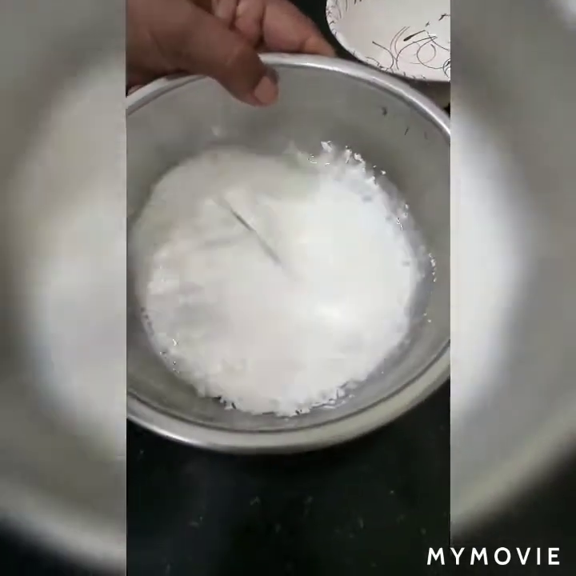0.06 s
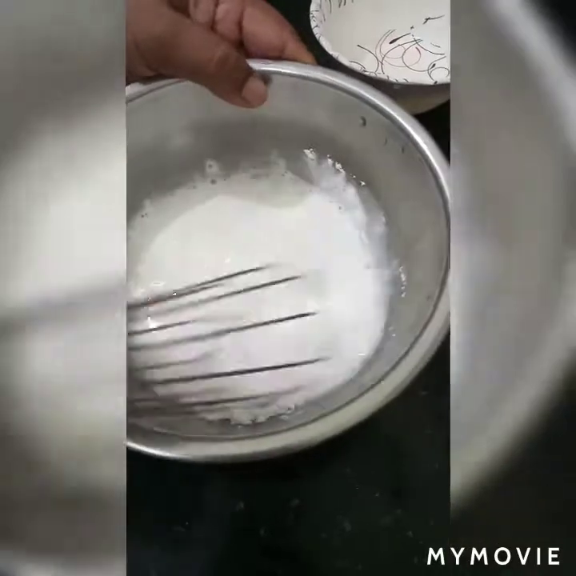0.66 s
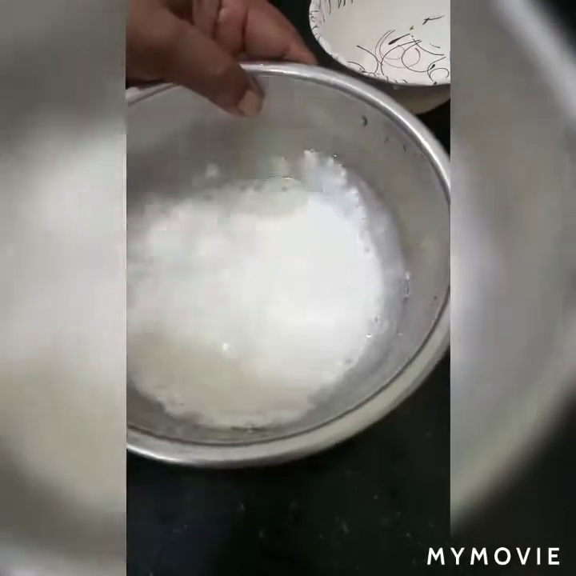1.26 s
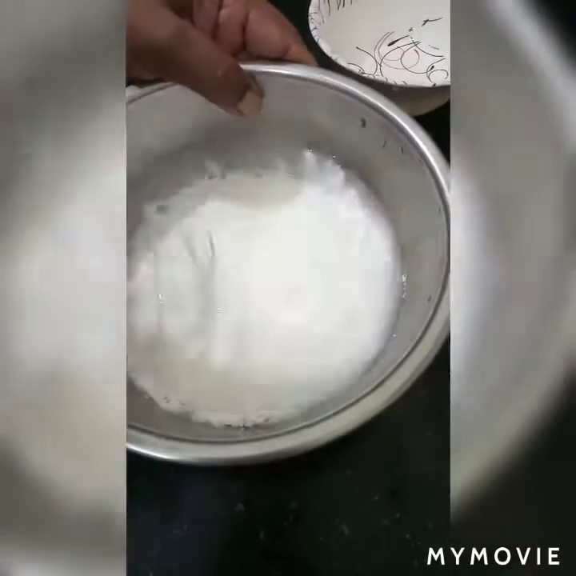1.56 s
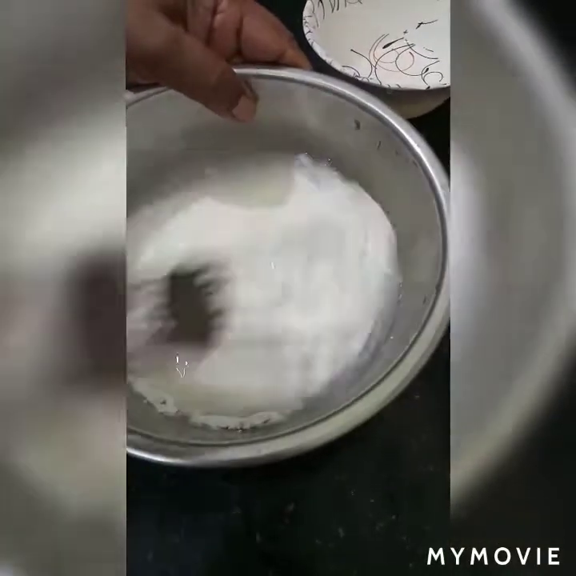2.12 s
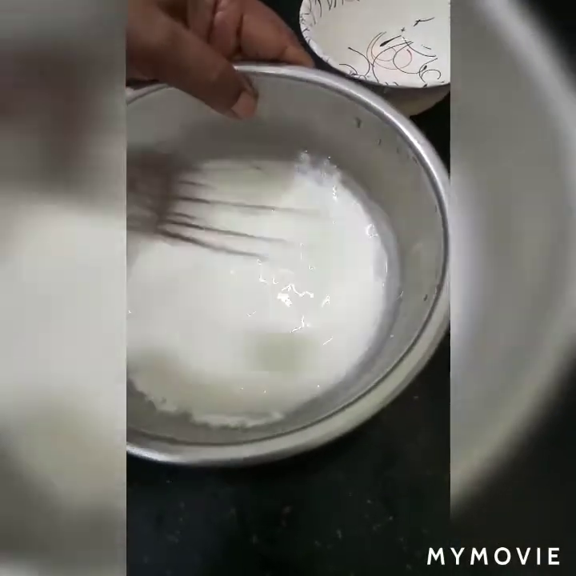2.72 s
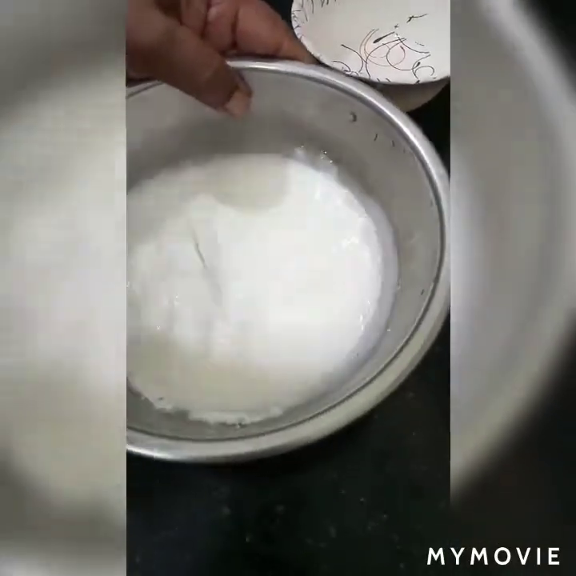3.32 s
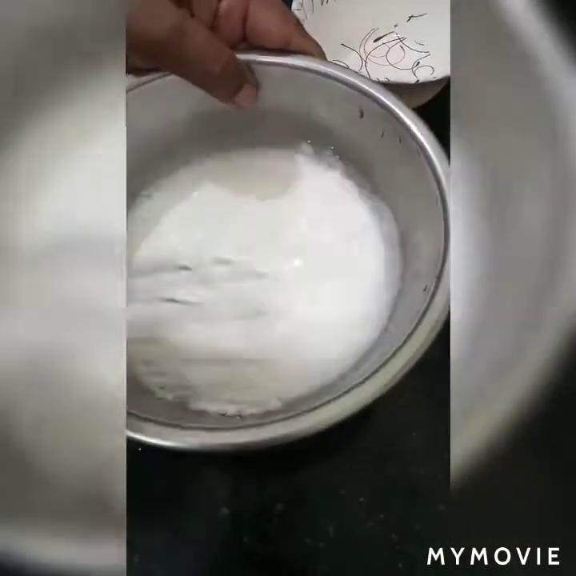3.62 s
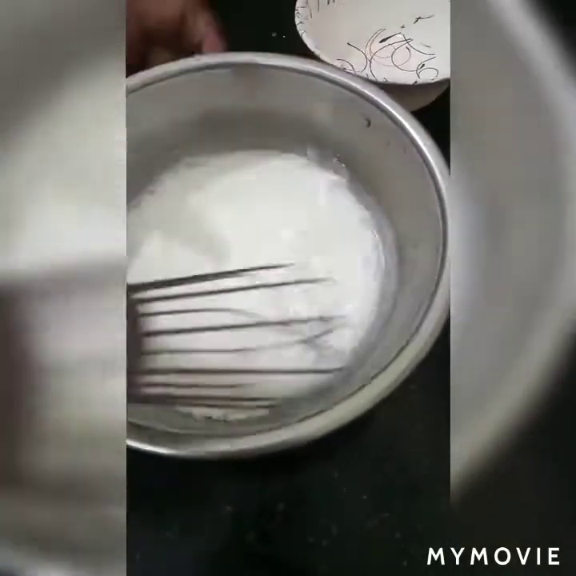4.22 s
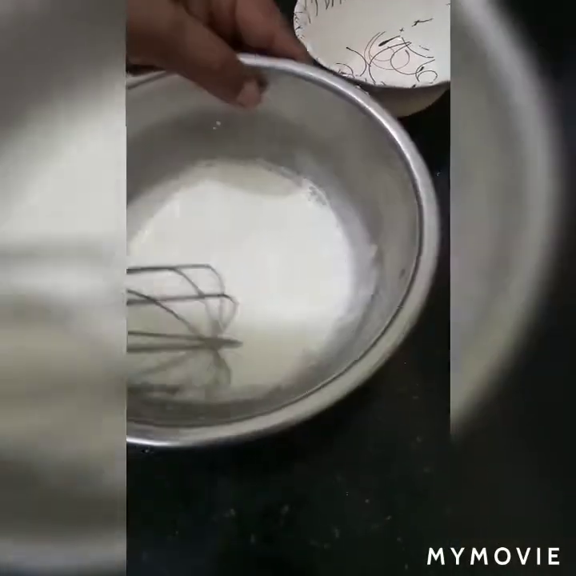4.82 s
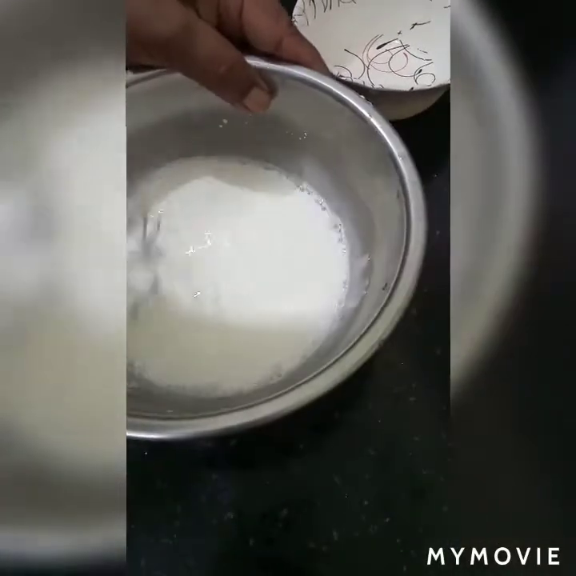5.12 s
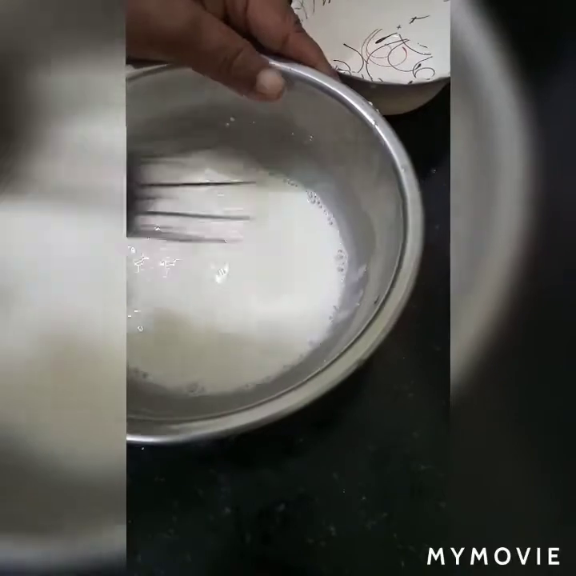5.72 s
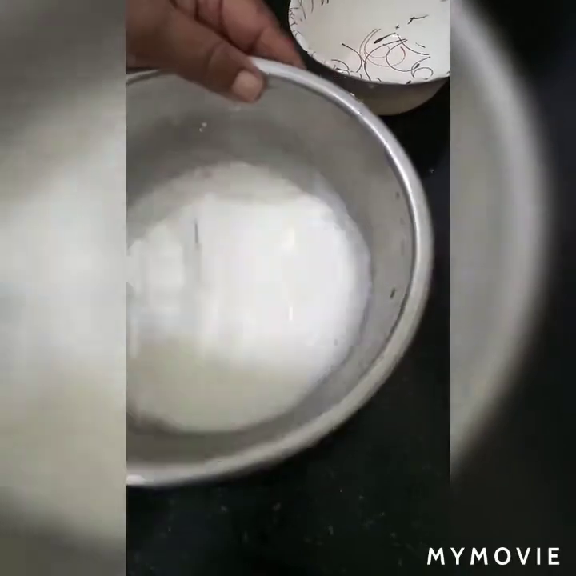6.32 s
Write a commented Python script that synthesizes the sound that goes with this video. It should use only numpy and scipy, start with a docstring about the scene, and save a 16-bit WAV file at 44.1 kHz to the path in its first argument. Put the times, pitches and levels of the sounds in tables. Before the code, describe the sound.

Close by in a small kitchen, thin batter churns and gurgles under rapid strokes of a wire whisk. Bright scrapes and clashing wires mix with metallic knocks against the steel bowl, which become stronger after the opening. Around four seconds in, the bowl rings more freely and soon gives a short, loud skid on the counter before the beating continues. A motor hums faintly throughout.

```python
"""Whisking batter in a steel bowl

A wire whisk beats thin batter, three or four strokes a second, in a small kitchen with a humming motor.
The wires clash with each other, knock on the wall, scrape the floor and churn the liquid, which
sloshes and plops. The steadying hand lets go for a moment: the bowl rings freely, then judders
across the stone counter."""
import sys
import numpy as np
from scipy import signal
from scipy.fft import rfft, irfft, next_fast_len
from scipy.io import wavfile
from scipy.ndimage import map_coordinates

SR = 44100
rng = np.random.default_rng(int(sys.argv[2]) if len(sys.argv) > 2 else 0)


def digitize_waveform(pressure):
    """Quantize a signal to 16-bit integers and store it at the path in sys.argv[1].

    Rows of a 2-D input are taken as channels; values are limited to [-1, 1].
    """
    field = np.atleast_2d(pressure).T
    bounded = np.clip(field, -1, 1)
    quanta = np.round(bounded * 32767).astype(np.int16)
    wavfile.write(sys.argv[1], SR, quanta)


N = 280476
TIME = np.arange(N) / SR
RING_TIME = np.arange(SR * 2 // 3) / SR


def amp(db):
    """Decibels to gain."""
    return 10 ** (np.asarray(db) / 20)


def unit(x):
    """Scale to rms 1."""
    return x / np.sqrt(np.mean(x ** 2) + 1e-20)


def along(points, hz):
    """Read a curve of (Hz, value) points on a log frequency axis."""
    freqs, values = np.transpose(points)
    return np.interp(np.log(hz + 1), np.log(freqs + 1), values)


def curves(rows):
    """Automation lanes: one value per sample for each column after the time."""
    times, *columns = np.transpose(rows)
    return [np.interp(TIME, times, column) for column in columns]


def wobble(rate):
    """A smooth random curve, `rate` knots a second."""
    return map_coordinates(rng.standard_normal(int(N * rate / SR) + 4), [TIME * rate])


def add(track, s, x):
    """Mix x into the track at s seconds."""
    start = int(np.clip(round(s * SR), 0, N - 1))
    track[start:start + len(x)] += x[:N - start]


def colour(spectrum, lo_hz=1, hi_hz=SR, size=2048):
    """One band of an EQ curve as a minimum-phase impulse response of energy 1."""
    hz = np.fft.rfftfreq(size, 1 / SR) + 1
    gain = amp(along(spectrum, hz)) / np.sqrt((1 + (lo_hz / hz) ** 10) * (1 + (hz / hi_hz) ** 10))
    cepstrum = irfft(np.log(gain + 1e-5))[:size // 2]
    response = irfft(np.exp(rfft(np.r_[cepstrum[0], 2 * cepstrum[1:]], size)))
    return response / np.linalg.norm(response)


def through(x, response):
    """Send x through an impulse response, cut to the length of the scene."""
    return signal.fftconvolve(x, response)[:N]


def resonate(x, response):
    """Let x ring a resonator, keeping the energy of x."""
    ring = through(x, response)
    return ring * np.linalg.norm(x) / np.linalg.norm(ring)


def note(hz, t60, attack, rise=0):
    """One damped tone whose pitch may glide up as it dies."""
    t = RING_TIME[:SR // 8]
    envelope = amp(-60 * t / t60) * (1 - np.exp(-t / attack))
    return envelope * np.sin(2 * np.pi * hz * t * (1 + rise * t / t60))


def ringing(modes, damping, scatter_db, detune=0, attack=0.022):
    """Decaying modes, struck at a new spot each time; damping divides their decay times."""
    hz, db, t60 = np.transpose(modes)[:, :, None]
    hz = hz * (1 + detune * rng.standard_normal(hz.shape))
    t = RING_TIME[:int(len(RING_TIME) / max(damping, 1))]
    level = db + scatter_db * rng.standard_normal(hz.shape) - 60 * t * damping / t60
    partials = amp(level) * np.sin(2 * np.pi * (hz * t + rng.random(hz.shape)))
    return partials.sum(axis=0) * (1 - np.exp(-t / attack))


def grit(count, spread_db):
    """Micro-contacts: noise whose force jumps every 16 samples; rms 1."""
    force = amp(spread_db * np.repeat(rng.standard_normal(count), 16)[:count])
    return unit(rng.standard_normal(count) * force)


def chatter(length, spread_db, after_db, after_t60):
    """Contacts land one after another in a short burst, then shiver away."""
    t = RING_TIME[:SR // 6]
    burst = np.exp(-(t / max(length, .001)) ** 3) + amp(after_db - 60 * t / after_t60)
    return grit(len(t), spread_db) * burst * (1 - np.exp(-t / .0008))


def shifting(modes, t60, depth_db, rate):
    """Resonances that swell and fade each on its own, so the colour keeps moving; rms 1."""
    drives = [grit(N, spread_db=3) * amp(db + depth_db * wobble(rate)) for _, db in modes]
    return unit(sum(through(drive, note(hz, t60, attack=.0005)) for drive, (hz, _) in zip(drives, modes)))


def bubbles(per_second, centre_hz, octaves, cycles, spread_db, rise, size=1400):
    """Small pockets of air, each a short note that rises as it closes; rms 1."""
    when, pitch, strength = rng.random((int(per_second * N / SR), 3)).T
    hz = centre_hz * 2 ** (octaves * (pitch[:, None] - .5))
    age = hz * np.arange(size) / SR / cycles
    gain = amp(-spread_db * np.log(strength + .01))[:, None]
    notes = gain * np.exp(-3 * age) * np.sin(2 * np.pi * cycles * age * (1 + rise * age))
    index = (when * N).astype(int)[:, None] + np.arange(size)
    return unit(np.bincount(index.ravel(), notes.ravel(), N)[:N])


# motor partials: (frequency [Hz], level [dB])
MOTOR_HUM = [(98.3, -64), (177, -70), (244.5, -60.5), (274, -67), (296, -66.5)]
# EQ of the air bed: (frequency [Hz], level [dB])
AIR_EQ = [(20, -28), (50, -6), (80, 1), (130, -2.5), (185, 11.5), (270, 4.5), (350, -16.5), (470, -20),
          (640, -31), (2000, -50), (15000, -88)]


def room_tone():
    """A motor hums unsteadily over a low rush of air."""
    hum = np.zeros(N)
    for hz, db in MOTOR_HUM:
        gain = np.sqrt(2) * amp(db + 2.5 * wobble(7))
        hum += gain * np.sin(2 * np.pi * hz * TIME + 1.1 * wobble(8))
    return hum + amp(-63.5) * through(rng.standard_normal(N), colour(AIR_EQ))


# reverb decay: (frequency [Hz], t60 [s])
KITCHEN_DECAY = [(200, 0.71), (1200, 0.27), (4000, 0.25), (10000, 0.2), (16000, 0.26)]


def kitchen_reverb(x):
    """Hard walls close by: a short, bright tail after 5 ms of pre-delay."""
    hz, t, noise = signal.stft(rng.standard_normal(SR // 2), SR, nperseg=256)
    decay = amp(-60 * t / along(KITCHEN_DECAY, hz)[:, None])
    tail = signal.istft(noise * decay, SR, nperseg=256)[1]
    return through(x, np.pad(tail / np.linalg.norm(tail), (int(.005 * SR), 0)))


# how hard the mass of batter swings: (time [s], level [dB])
SLOSH_FADER = [(0.0, -47.5), (0.07, -69), (0.18, -46), (0.37, -64), (0.41, -44.5), (0.67, -62), (0.71, -53),
               (1.03, -52.5), (1.04, -55.5), (1.72, -48.5), (1.96, -66), (2.04, -46), (2.07, -62),
               (2.12, -50), (2.23, -83), (2.27, -58), (2.48, -48.5), (2.53, -65), (2.71, -50.5),
               (2.96, -60), (3.12, -45), (3.17, -61), (3.49, -46.5), (3.51, -64), (3.72, -52),
               (3.74, -50.5), (4.27, -55), (4.29, -47), (4.52, -56), (4.64, -56), (4.68, -46),
               (4.69, -43.5), (4.87, -46), (4.92, -59), (5.07, -51), (5.1, -56.5), (6.13, -52),
               (6.24, -53.5), (6.32, -51.5), (6.36, -66)]
# its dull body: (frequency [Hz], level [dB])
SLOSH_EQ = [(60, -27.5), (130, -6), (185, 1), (240, 1), (340, -7.5), (470, -14.5), (620, -35), (1200, -43),
            (3000, -54)]


def slosh():
    """The mass of batter swings round the bowl in dull, lumpy surges."""
    surges = rng.standard_normal(N) * amp(1.6 * wobble(30))
    return amp(curves(SLOSH_FADER)[0] - 3) * unit(through(surges, colour(SLOSH_EQ)))


# hollows opening in the wake: (frequency [Hz], level [dB])
WAKE_CAVITIES = [(840, 1.5), (1060, 1.5), (1330, 1), (1610, -2.5), (1850, -0.5), (2600, -6), (3050, -4)]
# splashing batter: (frequency [Hz], level [dB])
SPLASH_EQ = [(200, 3), (450, 7.5), (680, -6), (850, -20), (1700, 7.5), (2300, -2.5), (4000, 2.5),
             (9000, -15)]


def churn(level_db):
    """The batter bubbles, gurgles and splashes behind the wires."""
    wet = bubbles(per_second=160, centre_hz=1200, octaves=1.3, cycles=16, spread_db=1.8, rise=.03)
    gurgle = shifting(WAKE_CAVITIES, t60=.055, depth_db=7, rate=35)
    splash = through(grit(N, spread_db=3) * amp(4 * wobble(60)), colour(SPLASH_EQ))
    return amp(level_db) * (amp(-10) * wet + amp(-7.5) * gurgle + amp(-9.5) * splash)


# batter closing behind the wires: (time [s], level [dB], pitch [Hz])
PLOP_CUES = [(0.119, -37.5, 1050), (0.14, -39, 976), (0.165, -40, 813), (0.993, -43.5, 1065),
             (1.394, -33, 1187), (1.464, -39, 1690), (1.482, -31.5, 1118), (1.669, -32, 845),
             (1.732, -31, 840), (1.796, -41, 1120), (1.844, -30.5, 1024), (1.875, -41, 947),
             (2.038, -31, 1614), (2.089, -32.5, 1345), (2.107, -30.5, 1320), (2.386, -33.5, 1350),
             (2.792, -33, 927), (2.865, -40, 1070), (2.953, -34.5, 1260), (3.212, -34.5, 1060),
             (3.421, -35, 1350), (3.552, -25.5, 1037), (3.893, -23.5, 1124), (4.087, -35.5, 820),
             (4.327, -29.5, 1275), (5.004, -37.5, 1735), (5.907, -29.5, 1024), (5.941, -36.5, 1016),
             (6.214, -41, 1430)]
# a collapsing air pocket: (frequency [Hz], level [dB])
POCKET_EQ = [(200, -9.5), (480, -5.5), (680, -22.5), (850, 7.5), (1300, 0.5), (1800, -2.5), (2300, -12),
             (4000, -7), (9000, -18)]


def plops():
    """Larger air pockets: a wet slap, a short rising note and a smaller pocket just after it."""
    out = np.zeros(N)
    for s, db, hz in PLOP_CUES:
        slap = through(chatter(.011, spread_db=2, after_db=-15, after_t60=.15), colour(POCKET_EQ))
        add(out, s, amp(db - 12.5) * slap)
        add(out, s, amp(db - 8) * note(hz, t60=.06, attack=.0012, rise=.03))
        lag_s, small_hz = rng.uniform(0, .005), hz * rng.uniform(1.25, 1.6)
        add(out, s + lag_s, amp(db - 11) * note(small_hz, t60=.035, attack=.001, rise=.06))
    return out


# the free steel bowl: (frequency [Hz], level [dB], t60 before damping [s])
BOWL_MODES = [(178, -13, .6), (440, -15, .2), (763, -6, .28), (812, 8, .3), (907, -1, .22), (970, -7, .2),
              (1114, 4, .5), (1126, -8, .25), (1260, -6, .2), (1390, -6, .15), (1646, -5, .22),
              (1772, -5, .22), (1860, -6, .18), (2347, -3, .33), (2536, -11, .22), (3047, -14, .4),
              (3975, -2, .4), (4110, -3, .32), (4366, -4, .35), (4522, -4, .29), (5055, -4, .23),
              (5259, -8, .3), (6142, -5, .2), (6627, -6, .25), (7332, -11, .3), (9162, -6, .23),
              (9600, -5, .18), (10590, -8, .24)]


def bowl_ring(hollow_hz, below_db=18, above_db=2.5):
    """The bowl struck at one spot: modes below and above that spot's hollow note are stirred less."""
    hz, db, t60 = np.transpose(BOWL_MODES)
    octaves = np.log2(hz / hollow_hz)
    level = db - below_db * np.minimum(octaves, 0) ** 2 - above_db * np.clip(octaves, 0, 1) ** .5
    return ringing(np.transpose([hz, level, t60]), damping=1.3, scatter_db=1.5, detune=.002)


def judder(start_s, slips_per_s=85, scatter=0.32, t60=0.029):
    """Gain of the sliding base as it sticks and breaks free at an uneven rate."""
    gaps = np.exp(scatter * rng.standard_normal(100)) / slips_per_s
    slip_times = np.r_[0, start_s + np.cumsum(gaps)]
    since_slip = TIME - slip_times[np.searchsorted(slip_times, TIME, "right") - 1]
    return .25 + amp(-60 * since_slip / t60)


# the bowl sliding on the counter: (time [s], level [dB])
SKID_FADER = [(4.655, -65), (4.678, -25), (4.705, -33), (4.734, -21), (4.772, -28.5), (4.79, -59.5),
              (4.85, -63)]
# steel on stone: (frequency [Hz], level [dB])
COUNTER_EQ = [(60, -11), (170, -16), (450, -11.5), (690, -19.5), (870, 0.5), (1150, -23), (1750, -7),
              (2250, -32), (2550, -17.5), (3200, -35), (4100, -13), (4800, -21), (5100, -11), (5500, -19),
              (6300, -19.5), (7500, -25), (15000, -23.5)]


def skid():
    """The base sticks and slips on the counter, which shakes the bowl's modes and damps them too."""
    friction = grit(N, spread_db=-0.5) * judder(SKID_FADER[0][0]) * amp(curves(SKID_FADER)[0])
    slips = through(friction, colour(COUNTER_EQ, lo_hz=116))
    singing = resonate(slips, ringing(BOWL_MODES, damping=1.7, scatter_db=0, attack=.002))
    return amp(-2.5) * (slips + amp(-8) * singing)


# the wall's answer to dragging wires: (frequency [Hz], level [dB])
SONG_MODES = [(2550, -6.5), (3100, -13.5), (3600, -7.5), (4000, 2.5), (4190, 5), (4420, 1.5), (6600, -5.5)]
# it grows as the lumps dissolve and bare the steel: (time [s], level against the scrape [dB])
SONG_FADER = [(0, -36), (2, -11), (4, -12), (5.6, -11.5), (6.36, -15)]


def wall_song(scrape_db):
    """The dragging wires stir now one, now another of a cluster of the wall's modes."""
    return amp(scrape_db + curves(SONG_FADER)[0]) * shifting(SONG_MODES, t60=.025, depth_db=4.5, rate=25)


# wire on floury steel: (frequency [Hz], level [dB])
SCRAPE_EQ = [(1500, -51), (2400, -2), (3500, -8.5), (4150, 0), (5200, 4.5), (6400, 9), (7800, 1.5),
             (9400, 12.5), (11300, 10.5), (13000, 1.5), (15500, 1.5)]


def scrape(level_db):
    """Wires drag over the floury steel in tiny slips, with a fizz of bursting froth."""
    steel = colour(SCRAPE_EQ)
    drag = grit(N, spread_db=5.5) * amp(3.5 * wobble(70))
    froth = bubbles(per_second=620, centre_hz=7400, octaves=2, cycles=60, spread_db=1.7, rise=.01)
    return amp(level_db - 6) * (through(drag, steel) + unit(through(froth, steel)))


# a wire skips on the floor of the bowl: (time [s], level [dB])
TICK_CUES = [(0.591, -44.5), (0.91, -48), (0.9913, -40), (1.195, -40.5), (1.363, -40), (2.492, -42),
             (2.7923, -41), (3.6667, -35), (5.087, -46), (5.1492, -42), (5.4263, -49), (5.8511, -45.5),
             (5.9884, -41), (6.071, -31)]


def ticks():
    """Single wires catch and skip on the floury floor."""
    out, steel = np.zeros(N), colour(SCRAPE_EQ)
    for s, db in TICK_CUES:
        add(out, s, amp(db) * through(chatter(.0078, spread_db=.5, after_db=-25, after_t60=.12), steel))
    return out


def sweep(start, length, release_s, attack_s=0.0055, swell_db=2.5):
    """Gain of one sweep: it bites, presses harder toward its end and lets go."""
    t = TIME - start
    edges = np.exp(np.minimum(t, 0) / attack_s - np.maximum(t - length, 0) / release_s)
    return edges * amp(swell_db * (np.clip(t / length, 0, 1) - 1))


# sweeps through the batter: (time [s], length [s], scrape level [dB], churn level [dB])
STROKE_CUES = [(0.069, 0.1, -44.5, -53.5), (0.4, 0.015, -45, -49), (0.745, 0.19, -45, -66.5),
               (0.96, 0.027, -48, -55), (1.153, 0.097, -46.5, -60), (1.292, 0.13, -43, -50),
               (1.483, 0.17, -45, -50), (1.647, 0.098, -39, -46.5), (1.819, 0.11, -42.5, -48.5),
               (2.011, 0.085, -38.5, -47.5), (2.266, 0.14, -39.5, -47.5), (2.589, 0.18, -41.5, -62),
               (2.907, 0.22, -41.5, -49.5), (3.263, 0.21, -40, -52), (3.654, 0.17, -39, -52),
               (3.879, 0.13, -42.5, -54.5), (4.187, 0.082, -43.5, -45.5), (4.525, 0.26, -39, -45),
               (4.847, 0.029, -35.5, -60), (5.138, 0.14, -49, -82), (5.653, 0.11, -39.5, -51.5),
               (5.913, 0.22, -39.5, -54.5), (6.252, 0.11, -38, -62)]
# between sweeps the whisk stays in, deeper or shallower: (time [s], scrape level [dB], churn level [dB])
TRAIL_FADERS = [(0, -44.5, -50), (0.33, -53, -88), (1.1, -55.5, -86), (1.4, -51, -74), (2.15, -45.5, -54),
                (2.5, -52, -52.5), (3.95, -49, -61), (4.14, -60.5, -75), (4.33, -46.5, -49),
                (4.41, -56.5, -57), (4.5, -71, -95), (4.95, -52.5, -55), (5.06, -57.5, -74),
                (5.3, -60, -52), (5.41, -65, -74), (5.61, -62.5, -100), (5.7, -43.5, -56),
                (6.36, -43.5, -59.5)]


def stirring(wake_lag_s=0.0023):
    """Level rides in dB for scrape and churn: the batter follows the wires and settles after them."""
    scraping, churning = amp(curves(TRAIL_FADERS))
    for start, length, scrape_db, churn_db in STROKE_CUES:
        scraping = np.maximum(scraping, amp(scrape_db) * sweep(start, length, release_s=.017))
        churning = np.maximum(churning, amp(churn_db) * sweep(start + wake_lag_s, length, release_s=.075))
    return 20 * np.log10([scraping, churning])


# wire against wire: (time [s], high level [dB], low level [dB], rattle length [s], focus [Hz])
CLASH_CUES = [(0.02, -35, -39, 0.011, 15100), (0.038, -26, -29.5, 0.045, 14400),
              (0.089, -25, -32.5, 0.016, 14500), (0.3538, -29, -22, 0.0052, 13400),
              (0.36, -21, -32, 0.009, 14600), (0.648, -42, -49, 0.0036, 14500),
              (0.66, -26.5, -34.5, 0.019, 14600), (1.104, -35.5, -41, 0.01, 13200),
              (1.493, -28, -33, 0.019, 13300), (1.858, -24.5, -31.5, 0.018, 14100),
              (2.207, -27, -30, 0.014, 15100), (2.564, -35, -36, 0.0085, 13200),
              (2.573, -25, -30.5, 0.012, 15300), (2.601, -30, -35.5, 0.018, 15200),
              (2.853, -39, -39.5, 0.0068, 13300), (2.902, -32, -36, .009, 15200),
              (2.925, -40, -25.5, 0.028, 13100), (3.18, -27.5, -52, 0.0089, 13100),
              (3.2395, -29.5, -32.5, 0.012, 15100), (3.281, -23, -32, 0.009, 15200),
              (3.314, -32, -33, 0.0096, 13200), (3.596, -22, -28.5, 0.0041, 15100),
              (3.63, -23, -28.5, 0.013, 15200), (3.863, -24.5, -36, 0.013, 13200),
              (3.938, -32, -35, 0.014, 15200), (4.116, -35, -44, 0.0095, 13200),
              (5.522, -37, -38.5, 0.0091, 15200), (6.284, -25, -33, 0.011, 14100)]
# the dry rattle: (frequency [Hz], level [dB])
WIRE_EQ = [(2500, -23.5), (3700, -13), (4300, -2.5), (6400, -3), (7700, -10), (9400, 7), (11500, 0.5),
           (12400, 2.5), (13300, 7), (15300, 9), (16000, -1)]
# the wire loops, low and high partials: (frequency [Hz], level [dB], t60 before damping [s])
LOW_LOOP_MODES = [(4450, -2, 0.065), (6150, -6, 0.074), (9300, -3, 0.19), (9800, -2, 0.058),
                  (10800, 7, 0.083), (11800, -8, 0.15)]
HIGH_LOOP_MODES = [(13500, -6, 0.13), (13300, 5, 0.07), (14400, -2, 0.086), (14700, -1, 0.11),
                   (14500, -4, .12), (15130, -3, 0.11), (15200, -3, .12), (15550, -3, .1)]


def clashes(falloff_db_per_khz=10):
    """The loops flick past each other: a dry rattle that rings the partials of whichever wires meet."""
    out = np.zeros(N)
    low, high = colour(WIRE_EQ, hi_hz=11800), colour(WIRE_EQ, 12300, 16000)
    for s, high_db, low_db, length, focus_hz in CLASH_CUES:
        focused = [(hz, db - falloff_db_per_khz * abs(hz - focus_hz) / 1000, t60)
                   for hz, db, t60 in HIGH_LOOP_MODES]
        for band, modes, level in (low, LOW_LOOP_MODES, low_db - 4), (high, focused, high_db - 4.5):
            rattle = through(chatter(length, spread_db=4.5, after_db=-26, after_t60=.22), band)
            partials = ringing(modes, damping=1.3, scatter_db=2, detune=.007, attack=.0003)
            add(out, s - .001, amp(level) * rattle)
            add(out, s - .001, amp(level - 7.5) * resonate(rattle, partials))
    return out


def tap_cues(scrape_db, per_second=4):
    """Cues for light knocks at chance moments, about 13 dB under the scrape level just then."""
    count = int(per_second * N / SR)
    when = np.sort(rng.integers(N, size=count))
    softness, bright, pitch = np.clip(rng.standard_normal((count, 3)), -1, 1).T
    db = scrape_db[when] - 13 - .5 * softness
    hollow_hz, ping_hz = 1170 * np.exp(.25 * pitch), 6140 * np.exp(.097 * softness)
    return list(zip(when / SR, db, 4 * bright, hollow_hz, ping_hz, np.zeros(count)))


def hollow(x, hz):
    """The pocket between wires and wall rings at its hollow note and two chance overtones."""
    ratios = (1, *rng.uniform([1.2, 1.6], [1.5, 2.1]))
    return resonate(x, sum(note(hz * ratio, t60=.07, attack=.0005) / ratio for ratio in ratios))


# whisk on the wall, duller where the batter is deep:
# (time [s], level [dB], brightness [dB], hollow note [Hz], ping [Hz], ping over the level [dB])
KNOCK_CUES = [(0.401, -45, -2, 1750, 6420, 3), (0.418, -48.5, 2, 1950, 6340, 12),
              (0.4533, -49, 5, 1580, 6400, 7), (0.548, -51.5, 4, 1080, 7460, 3),
              (0.702, -44.5, 13.5, 1310, 6050, 6), (1.2254, -55, -25.5, 853, 6100, 2),
              (1.4012, -46, -10, 1175, 5975, 6), (1.488, -53.5, -2, 870, 6100, 2),
              (1.5847, -43.5, 5, 823, 6080, 8), (1.695, -44.5, -2, 1220, 6540, 10),
              (1.8944, -42.5, -2, 1340, 6380, 1), (2.2724, -29.5, 3, 861, 7320, 3),
              (2.3432, -33.5, -1, 873, 5660, 7.5), (2.404, -42.5, 2, 930, 8640, 7),
              (2.469, -51, -14, 1010, 4080, 4), (2.6417, -30.5, 2, 830, 5910, -3),
              (2.6855, -39.5, 2, 958, 6500, 12), (2.7, -32.5, -0.5, 940, 3960, 2),
              (2.9085, -31.5, 8.5, 1000, 5900, 8), (2.9537, -34.5, 6, 968, 8250, 8),
              (3.041, -41.5, -6, 1280, 4100, 10), (3.0687, -32.5, 5, 915, 6850, 7),
              (3.2624, -48.5, -14.5, 1650, 4330, 1), (3.3483, -30.5, 5.5, 833, 7310, 14.5),
              (3.3953, -30, 2.5, 830, 4110, 6.5), (3.445, -44.5, 8, 1030, 5770, 10),
              (3.5503, -42, -6, 1415, 4344, 18), (3.692, -29.5, 8, 1780, 6700, 9.5),
              (3.7449, -32, 1.5, 915, 6790, 7), (3.891, -39, 4, 1135, 4090, 9.5),
              (3.961, -40, 9, 1248, 6000, 3), (3.9744, -41.5, 16, 1300, 5650, 10),
              (4.1696, -30, 5.5, 1750, 6700, -2), (4.2837, -31.5, 0.5, 816, 4120, 15),
              (4.5203, -28.5, 5.5, 1666, 6150, -8), (4.5511, -35.5, 1.5, 1730, 4070, -1),
              (4.6196, -44, 15, 1630, 6700, 10), (4.6773, -35.5, -15, 1810, 5060, 11),
              (4.878, -40, 10, 1840, 6400, -4), (5.1643, -38, 13, 2080, 9100, 5),
              (5.1828, -37, 14, 1555, 5990, 5), (5.197, -43.5, 15, 1960, 6400, 7),
              (5.2708, -41.5, 5, 1784, 6370, -8), (5.4612, -50.5, -2.5, 845, 4400, 14.5),
              (5.6578, -38.5, 5, 1010, 6080, 7.5), (5.68, -40, 4, 1593, 4300, 11),
              (5.7938, -35.5, 10.5, 968, 5835, 6), (5.904, -44, -1, 1400, 4810, 10.5),
              (6.0098, -30, 6, 822, 4820, 5.5), (6.042, -36, 6, 800, 4100, 8),
              (6.1392, -34.5, 8.5, 1012, 6020, 5), (6.2447, -33.5, 12.5, 1364, 5770, 4)]
# the struck wall: (frequency [Hz], level [dB])
WALL_EQ = [(100, -1), (430, -3), (680, -13), (840, 2), (1750, 2.5), (2250, -5), (3000, 4.5), (3600, 7.5),
           (4150, 14), (5200, 11), (6600, 15), (8000, 6.5), (9600, 11), (12500, 3), (16000, -2.5)]
# batter thrown against the wall: (frequency [Hz], level [dB])
SLAP_EQ = [(150, -13), (330, 2.5), (520, 3), (700, -5.5), (900, -1), (1500, -6.5), (2300, -13), (6000, -43)]
# how freely the steel rings; the hand lets go of the rim for a moment: (time [s], level [dB])
RING_FADER = [(4.1, -21), (4.16, -1), (4.22, 1), (4.27, -6), (4.53, -3.5), (4.66, -9)]
CONTACT_S, CHOKE_T60_S = 0.01, 0.1
LOW_CUT_HZ, BRIGHT_DB_PER_OCTAVE = 136, 3.5


def knocks(cues):
    """The whisk hits the wall; each spot and depth of batter has its own hollow note and steel ping."""
    out = np.zeros(N)
    middle, high = colour(WALL_EQ, 3200, 9000), colour(WALL_EQ, 9000, 16000)
    next_times = [cue[0] for cue in cues[1:]] + [N / SR]
    for (s, db, bright_db, hollow_hz, ping_hz, ping_db), next_s in zip(cues, next_times):
        low_db, high_db = db - bright_db / 2, db + bright_db / 2
        glance_db = max(bright_db, 0)  # a glancing blow is too brief to shake the lows
        low = colour(WALL_EQ, LOW_CUT_HZ * 2 ** (glance_db / BRIGHT_DB_PER_OCTAVE), 2550)
        length = CONTACT_S * np.exp(.024 * rng.standard_normal())
        slap = through(chatter(.035, spread_db=2, after_db=-12, after_t60=.2), colour(SLAP_EQ))
        add(out, s + .008, amp(low_db - 18 - glance_db / 2) * slap)
        body = through(chatter(length, spread_db=.5, after_db=-21.5, after_t60=.32), low)
        add(out, s - .001, amp(low_db - 4) * body)
        add(out, s - .001, amp(low_db - 6.5) * hollow(body, hollow_hz))
        for band, level in (middle, db + 1), (high, high_db - .4):
            contact = chatter(length, spread_db=2.5, after_db=-19, after_t60=.42)
            add(out, s - .001, amp(level) * through(contact, band))
        add(out, s, amp(low_db - .5) * note(hollow_hz, t60=.054, attack=.002, rise=.071))
        thud = note(hz=581, t60=.059, attack=.0023)  # the batter-laden base
        add(out, s, amp(low_db - 8.5 - glance_db / 2) * thud)
        add(out, s, amp(db + ping_db) * note(ping_hz, t60=.038, attack=.00078))
        ring = bowl_ring(hollow_hz)
        freedom_db = np.interp(s, *np.transpose(RING_FADER))
        # the next knock presses on the wall and stops the ringing
        choke = amp(-60 * np.maximum(s + RING_TIME[:len(ring)] - next_s, 0) / CHOKE_T60_S)
        add(out, s, amp(low_db + freedom_db) * ring * choke)
    return out


def scene():
    """The mono mix: steel and batter, their reverb and the room tone."""
    scrape_db, churn_db = stirring()
    steel = knocks(KNOCK_CUES) + clashes() + ticks() + scrape(scrape_db) + wall_song(scrape_db) + skid()
    batter = churn(churn_db) + plops() + slosh()
    bed = room_tone()
    bowl = steel + batter + knocks(tap_cues(scrape_db))
    return (bowl + amp(-9.5) * kitchen_reverb(bowl) + bed)[None]


CEILING, BASS_CUT_HZ, TOP_HZ = .25, 38, 16000


def record(dry):
    """The master chain: soft-clip the sharpest peaks, roll off the deep bass and cut the very top."""
    rounded = dry / (1 + (dry / CEILING) ** 4) ** .25
    size = next_fast_len(N + SR // 2)
    hz = np.fft.rfftfreq(size, 1 / SR)
    passband = hz ** 2 / (hz ** 2 + BASS_CUT_HZ ** 2) * (hz < TOP_HZ)
    return irfft(rfft(rounded, size) * passband, size)[:, :N]


dry = scene()
out = record(dry)
digitize_waveform(out)
```